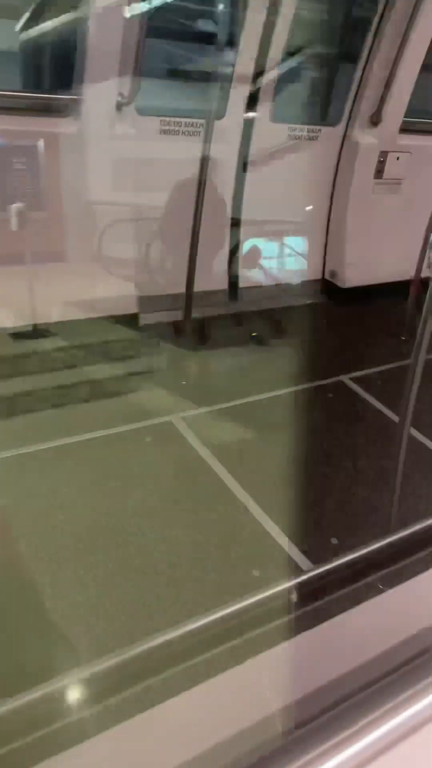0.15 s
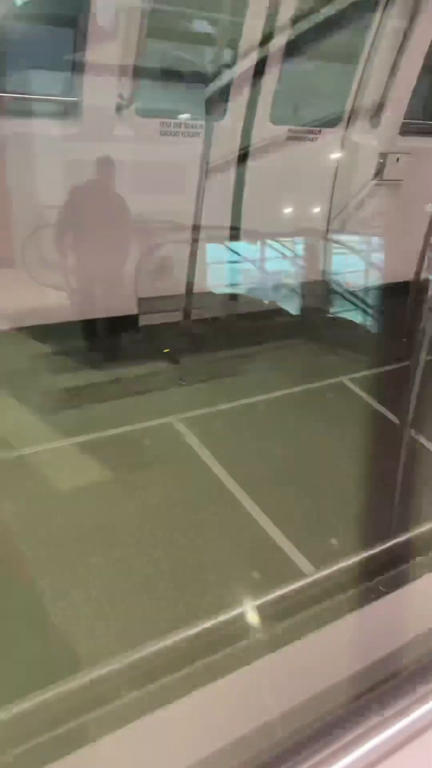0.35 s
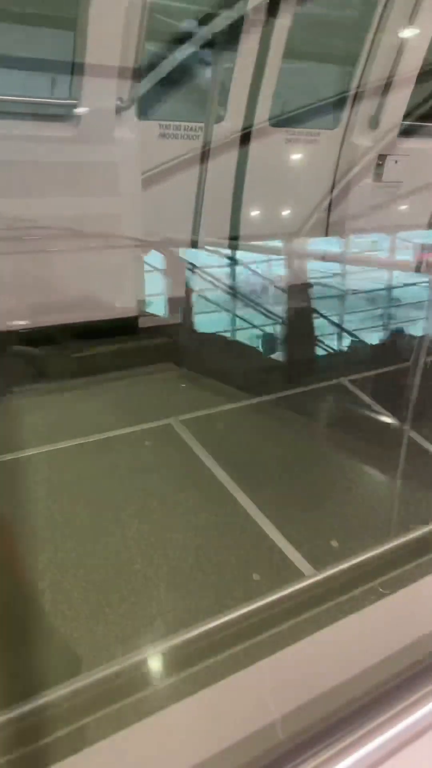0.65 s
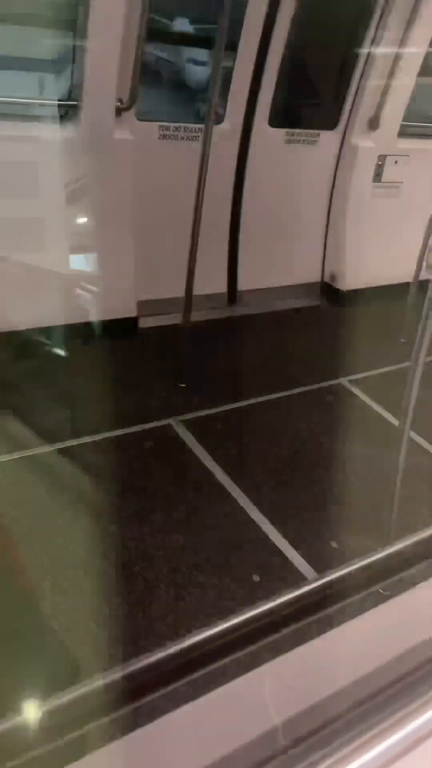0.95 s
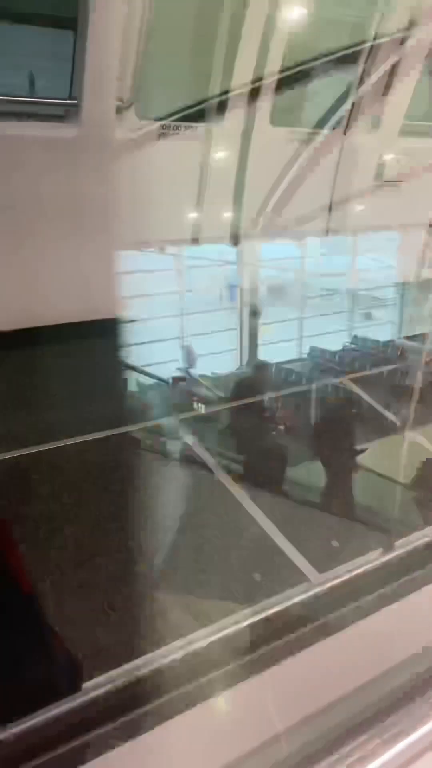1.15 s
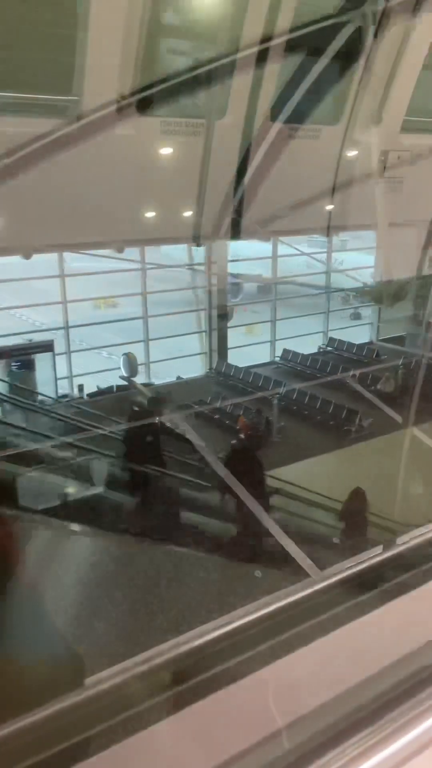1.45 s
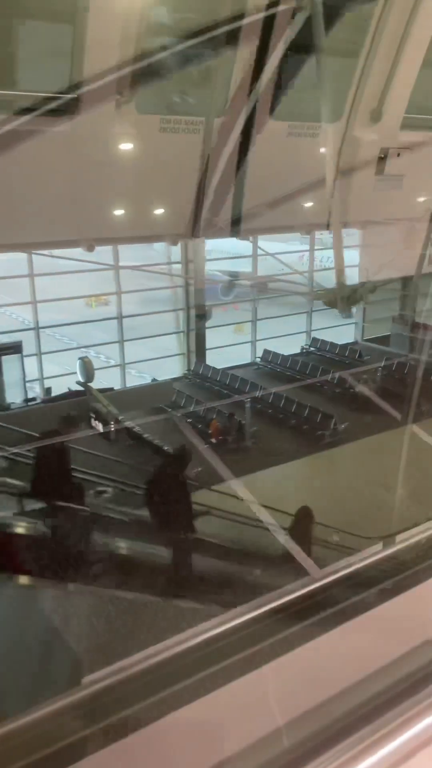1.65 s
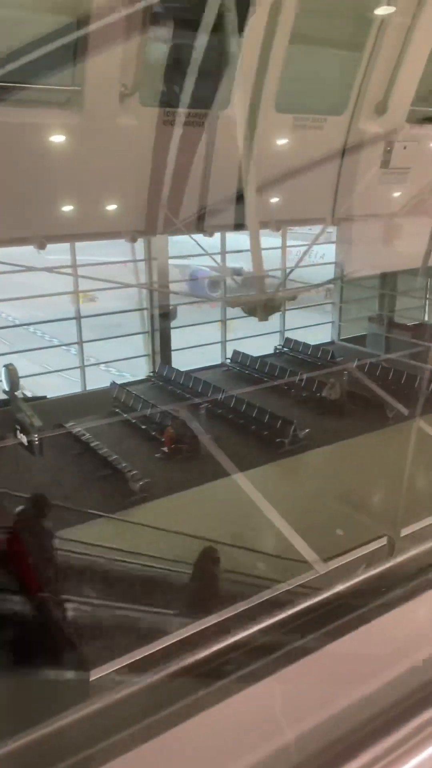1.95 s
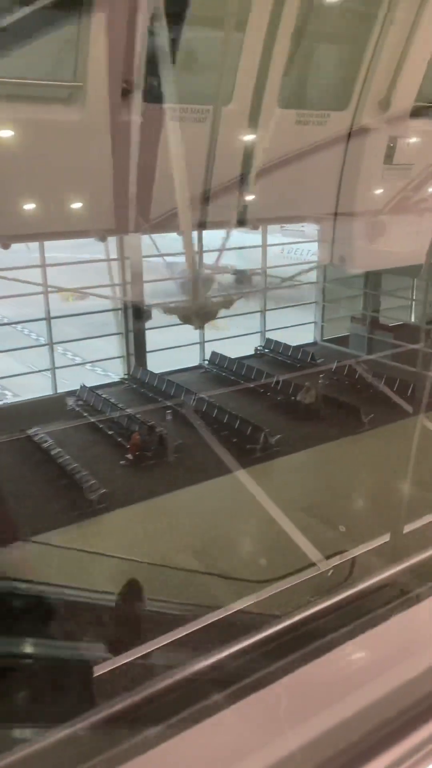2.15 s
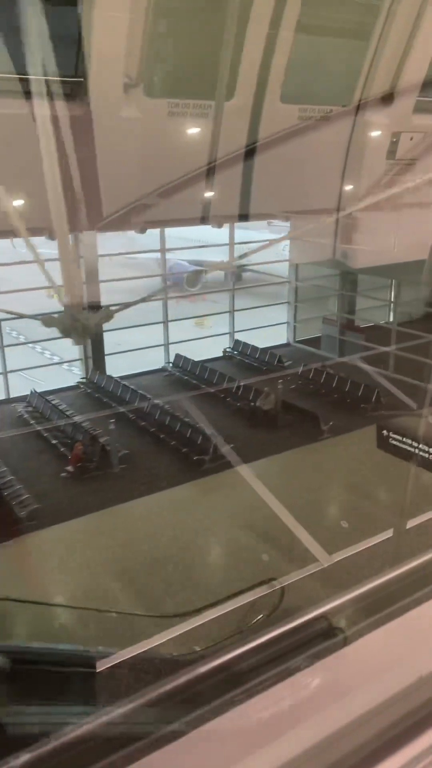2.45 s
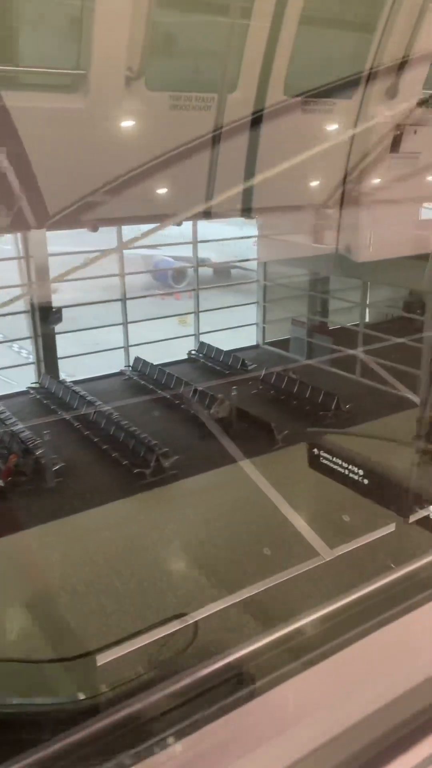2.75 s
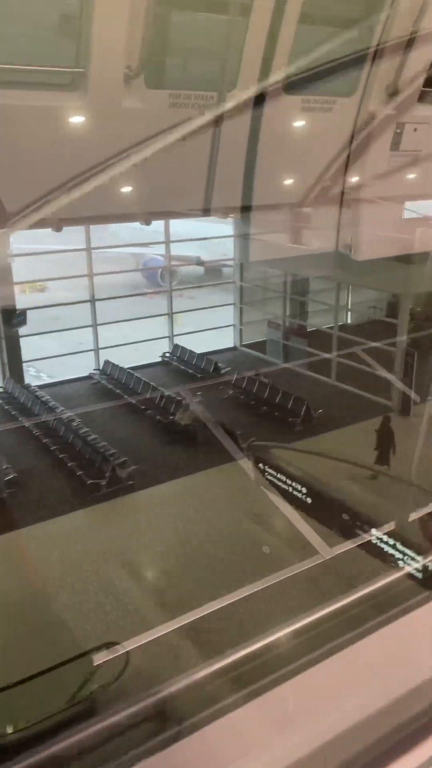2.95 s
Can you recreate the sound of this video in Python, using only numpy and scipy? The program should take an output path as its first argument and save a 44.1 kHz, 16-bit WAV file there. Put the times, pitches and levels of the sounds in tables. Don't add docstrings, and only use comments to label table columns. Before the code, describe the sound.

Low throbbing tram hum and rumble inside a gliding car, under soft air roar and small clicks.

```python
import sys
import numpy as np
from scipy import signal
from scipy.fft import rfft, irfft, next_fast_len
from scipy.io import wavfile
from scipy.ndimage import uniform_filter1d

SR = 44100
rng = np.random.default_rng(int(sys.argv[2]) if len(sys.argv) > 2 else 0)


def inscribe(sig):
    pcm = np.round(np.clip(np.atleast_2d(sig).T, -1, 1) * 32767)
    wavfile.write(sys.argv[1], SR, pcm.astype(np.int16))


def attenuation_scalar(level_db):
    decades = np.asarray(level_db, float) / 20
    return 10 ** decades


N = 136710

# start_s, level_db
HUM_LEVEL = [(.02, -21), (.45, -17), (.85, -22.5), (1.0, -17), (1.25, -20.5), (1.41, -17), (1.6, -20),
             (1.85, -22), (2.2, -19.5), (2.6, -20), (3.05, -17.5)]
# start_s, gain_db
OCTAVE_SWELL = [(0, 0), (.6, -3), (1.0, 2), (1.5, -1.5), (1.75, -1), (1.95, -5), (2.2, 1.5), (2.55, 3),
                (2.75, -4), (3.0, 1.5)]
# frequency_hz, density_db
RUMBLE_COLOUR = [(22, -22.5), (33, -27), (41, -7.5), (55, -5.5), (70, -0.5), (130, -3), (260, -9),
                 (600, -24)]
# pitch_hz, width_hz, level_db, left_right_likeness (0-1)
CABIN_RESONANCES = [
    (42.5, 3.3, -43, 1),
    (188, 13, -43, 1),
    (281.5, 25, -45, 1),
    (365.2, 12, -40.5, 0.66),
    (493, 41, -52, 0.25),
    (659, 54, -53.5, 1),
    (2182, 220, -57.5, 0.99),
]
# start_s, level_db
ROAR_LEVEL = [(0, -45.5), (.5, -41), (.64, -46.5), (.8, -43.5), (.9, -47), (1.35, -44), (1.45, -45.5),
              (1.95, -45.5), (2.15, -42.5), (2.33, -46), (2.55, -43.5), (2.8, -43), (3.1, -46)]
# frequency_hz, density_db
ROAR_COLOUR = [(200, -11), (420, 0.5), (1220, -1), (1400, -7), (1900, -12.5), (2600, -13.5), (3400, -21),
               (4900, -30)]
# start_s, level_db
HISS_LEVEL = [(0, -61), (.45, -56.5), (.6, -61), (.82, -55), (.95, -58.5), (1.2, -60.5), (1.4, -56),
              (1.6, -58.5), (1.95, -58.5), (2.1, -57), (2.3, -60.5), (2.45, -57.5), (2.7, -61.5),
              (2.9, -56.5), (3.1, -57)]
# frequency_hz, density_db
HISS_COLOUR = [(3000, -9.5), (4750, -4.5), (5100, -2.5), (6000, -5.5), (9500, -6), (10600, -4),
               (11500, -3.5), (12200, -23.5)]
# start_s, level_db
WHINE_LEVEL = [(0, -70), (.9, -72), (1.0, -66), (1.65, -66), (1.9, -74), (3.1, -75)]
# start_s, peak_db, ring_hz, decay_s
TICKS = [(.195, -44, 8000, .015), (.203, -39.5, 10200, 0.02), (.213, -35, 8020, 0.029),
         (.2215, -35, 7770, .03), (0.229, -42.5, 6460, .04), (.235, -43.5, 5960, .04),
         (0.346, -47, 7100, 0.052), (0.3616, -29.5, 3830, .025), (.3645, -36, 10900, 0.022),
         (.367, -44.5, 6500, 0.099), (.369, -39, 2400, 0.12), (0.882, -49.5, 6000, .015),
         (1.385, -44.5, 9460, 0.018), (1.4218, -37, 10500, 0.029), (1.54, -46.5, 10020, .03),
         (1.603, -48, 10450, .015), (1.697, -47, 10570, 0.022), (1.8058, -47.5, 6540, 0.015),
         (1.856, -48, 6960, .012), (2.353, -41, 10170, .012), (2.361, -42, 10600, .012),
         (2.3997, -34, 10000, .025), (2.402, -44, 4530, .04), (2.415, -45, 10000, 0.054),
         (2.434, -38, 9540, 0.022)]
# frequency_hz, likeness (0-1)
LIKENESS = [(200, 1), (420, 0.92), (700, 0.3), (1200, 0.28), (1650, 1), (2000, 0.78), (3300, 0.2),
            (5500, 0.82)]
# frequency_hz, lag_rad
PORT_LAG = [(0, 0), (120, .025), (1700, .05), (2900, 1.2), (3800, .9), (4650, 2.6), (5050, 4.1),
            (5950, 6.28), (8950, 9.42), (12000, 12.5)]

HUM_HZ, SECOND_HZ, PARTNER_HZ, FAN_HZ, WHINE_HZ = 120.9, 123.95, 243.3, 382.6, 5000
SECOND_DB, SECOND_JOINS_S, SECOND_RISE_S = -31.5, 0.62, 0.45
BEAT_TOP_S, OCTAVE_BEAT_TOP_S = 2.005, 2.342
OCTAVE_DB, PARTNER_DB, FAN_DB = -42, -34.5, -43
TONE_WAVER_DB, FAN_WAVER_DB = 3, 2.5
RUMBLE_DB, ROAR_GAIN_DB, HISS_GAIN_DB = -29, 5.5, 4
FAN_PAN_DB, CABIN_PAN_DB, WHINE_PAN_DB = -2.2, -1.5, -6.5
TICK_LOW_HZ, TICK_GAIN_DB = 4200, 3.5 - 5
TICK_RING_DB, TICK_RING_T60_S = -6, .025
GUST_S, GUST_RISE_S, GUST_FALL_S = 2.075, .03, 0.072
GUST_DB, GUST_GRAIN_DB, GUST_BAND_HZ = -43, 3, [950, 2900]
# band_hz (low, high), level_db below which it falls silent
SUM_GAP_HZ, SUM_GAP_DB = (8350, 9620), -67.5
DIFFERENCE_GAP_HZ, DIFFERENCE_GAP_DB = (5750, 6230), -72


def rms_one(x):
    return x / np.sqrt(np.mean(x ** 2) + 1e-20)


def in_time(rows):
    return np.interp(np.arange(N) / SR, *np.transpose(rows)[:2])


def at_hz(points, hz):
    table_hz, value = np.array(points).T
    return np.interp(np.log(hz + 1), np.log(table_hz), value)


def sides(pan_db):
    return attenuation_scalar(np.array([[pan_db / 2], [-pan_db / 2]]))


def drift(rate):
    r = np.exp(-80 * np.pi * rate / SR)
    white = rng.standard_normal(N // 40 + 2002)
    slow = signal.lfilter([1], [1, -2 * r, r * r], white)[2000:]
    return np.interp(np.arange(N) / 40, np.arange(len(slow)), rms_one(slow - slow.mean()))


def pair(alike):
    mid, side = rfft(rng.standard_normal((2, N)))
    alike = np.clip(alike, 0, 1)
    return np.sqrt(1 + alike) * mid + np.sqrt(1 - alike) * side * [[1], [-1]]


def patchy_noise(colour, shared_db, own_db, rate):
    hz = np.fft.rfftfreq(N, 1 / SR)
    inside = (hz > colour[0][0]) & (hz < colour[-1][0])
    both = pair(at_hz(LIKENESS, hz)) * attenuation_scalar(at_hz(colour, hz)) * inside
    place = 2 * np.log2(hz + 1)
    together = drift(rate / 2)
    out = 0
    for k in range(int(place[inside].min()), int(place[inside].max()) + 2):
        share = np.cos(np.pi / 2 * np.clip(place - k, -1, 1)) ** 2
        flicker_db = shared_db * together + own_db * drift(rate)
        out = out + attenuation_scalar(flicker_db) * irfft(both * share, N)
    return rms_one(out)


def tone(hz, db, from_s=0):
    level = attenuation_scalar(db + TONE_WAVER_DB * drift(3.3))
    return level * np.sqrt(2) * np.cos(2 * np.pi * hz * (np.arange(N) / SR - from_s))


def hum():
    t = np.arange(N) / SR
    main = attenuation_scalar(in_time(HUM_LEVEL)) * np.sqrt(2) * np.cos(2 * np.pi * HUM_HZ * t)
    joins = 1 / (1 + np.exp(-(t - SECOND_JOINS_S) / SECOND_RISE_S))
    second_cycles = HUM_HZ * t + (SECOND_HZ - HUM_HZ) * (t - BEAT_TOP_S)
    second = joins * attenuation_scalar(SECOND_DB) * np.sqrt(2) * np.cos(2 * np.pi * second_cycles)
    lead_s = OCTAVE_BEAT_TOP_S * (1 - 2 * HUM_HZ / PARTNER_HZ)
    octave = tone(2 * HUM_HZ, OCTAVE_DB) + tone(PARTNER_HZ, PARTNER_DB, lead_s)
    fan = tone(FAN_HZ, FAN_DB + FAN_WAVER_DB * drift(4)) * sides(FAN_PAN_DB)
    machines = main + second + attenuation_scalar(in_time(OCTAVE_SWELL)) * octave + fan
    return machines * attenuation_scalar(np.array([[-.1], [.1]]))


def rumble():
    return attenuation_scalar(RUMBLE_DB) * patchy_noise(RUMBLE_COLOUR, shared_db=-0.54, own_db=2.33, rate=6.1)


def cabin():
    hz = np.fft.rfftfreq(N, 1 / SR)
    out = 0
    for mid_hz, width_hz, db, alike in CABIN_RESONANCES:
        resonance = 1 / (1 + (2 * (hz - mid_hz) / width_hz) ** 2)
        ringing = rms_one(irfft(pair(alike) * resonance, N))
        out = out + attenuation_scalar(db) * sides(CABIN_PAN_DB * (mid_hz > HUM_HZ)) * ringing
    return out


def roar():
    noise = patchy_noise(ROAR_COLOUR, shared_db=0.33, own_db=0.78, rate=11)
    return attenuation_scalar(in_time(ROAR_LEVEL) + ROAR_GAIN_DB) * noise


def hiss():
    noise = patchy_noise(HISS_COLOUR, shared_db=0.94, own_db=0.93, rate=19)
    return attenuation_scalar(in_time(HISS_LEVEL) + HISS_GAIN_DB) * noise


def whine():
    return tone(WHINE_HZ, in_time(WHINE_LEVEL)) * sides(WHINE_PAN_DB)


def ticks():
    out = np.zeros(N + SR)
    t = np.arange(SR // 10) / SR
    high = signal.butter(2, TICK_LOW_HZ, "high", fs=SR, output="sos")
    for start_s, db, ring_hz, decay_s in TICKS:
        noise = rms_one(signal.sosfilt(high, rng.standard_normal(len(t))))
        ring = attenuation_scalar(TICK_RING_DB - 60 * t / TICK_RING_T60_S) * 2 * np.sin(2 * np.pi * ring_hz * t)
        dying = attenuation_scalar(db + TICK_GAIN_DB - 60 * t / max(decay_s, .004))
        first = int(start_s * SR)
        out[first:first + len(t)] += dying * (noise + ring)
    return out[:N]


def gust():
    t = np.arange(N) / SR - GUST_S
    shape = np.exp(-(t / np.where(t < 0, GUST_RISE_S, GUST_FALL_S)) ** 2)
    band = signal.butter(4, GUST_BAND_HZ, "band", fs=SR, output="sos")
    air = rms_one(signal.sosfilt(band, irfft(pair(0.53), N)))
    return attenuation_scalar(GUST_DB + GUST_GRAIN_DB * drift(60)) * shape * air


def scene():
    return hum() + rumble() + cabin() + roar() + hiss() + whine() + ticks() + gust()


def gated(spectrum, hz, band_hz, over_db):
    band = irfft(spectrum * ((hz > band_hz[0]) & (hz < band_hz[1])))
    level_db = 10 * np.log10(uniform_filter1d(band ** 2, size=1024) + 1e-20)
    return irfft(spectrum) - band / (1 + attenuation_scalar(4.0 * (level_db - over_db)))


def low_pass(x):
    return signal.sosfilt(signal.butter(12, 12500, fs=SR, output="sos"), x)


def record(dry):
    pad = 2045
    padded = np.pad(dry, [(0, 0), (pad, pad)], "reflect", reflect_type="odd")
    left, right = rfft(padded, next_fast_len(N + 4 * pad) // 2 * 2)
    hz = np.linspace(0, SR / 2, len(left))
    right = right * np.exp(-1j * np.interp(hz, *np.transpose(PORT_LAG)))
    mid = gated((left + right) / 2, hz, SUM_GAP_HZ, SUM_GAP_DB)
    side = gated((left - right) / 2, hz, DIFFERENCE_GAP_HZ, DIFFERENCE_GAP_DB)
    cut = signal.cheby2(10, 60, 12800, fs=SR, output="sos")
    mix = signal.sosfilt(cut, [mid + side, mid - side])[:, pad:pad + N]
    return low_pass(mix)


dry = scene()
out = record(dry)
inscribe(out)
```